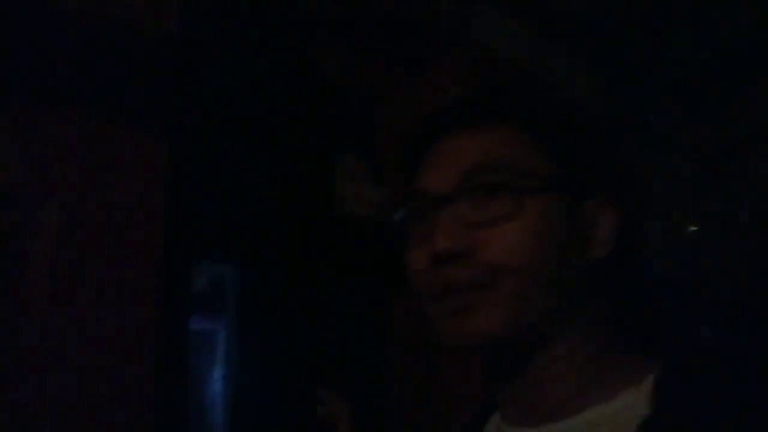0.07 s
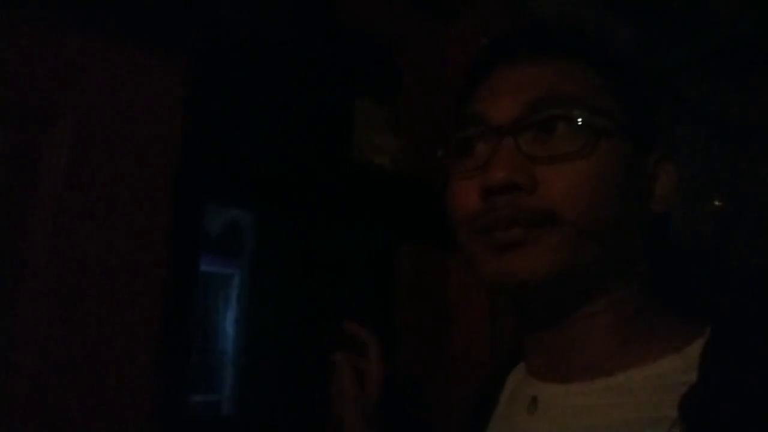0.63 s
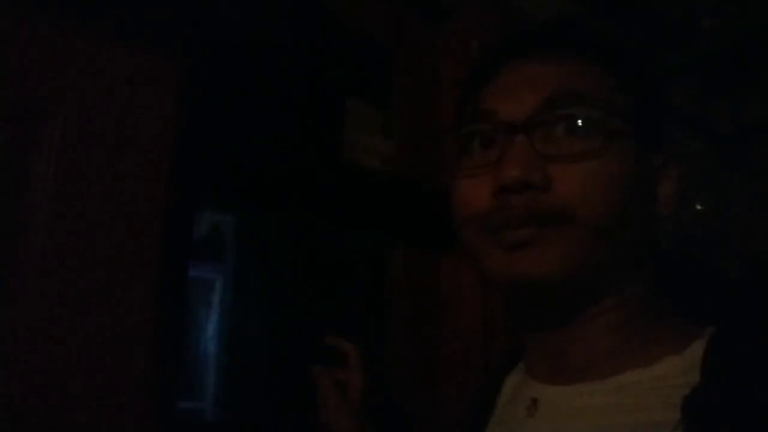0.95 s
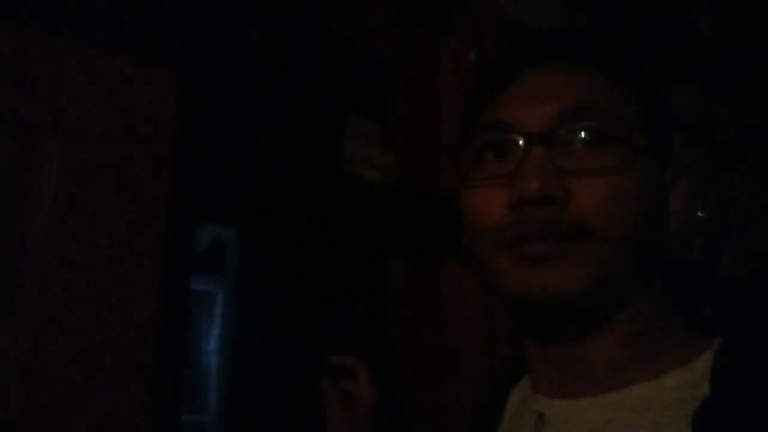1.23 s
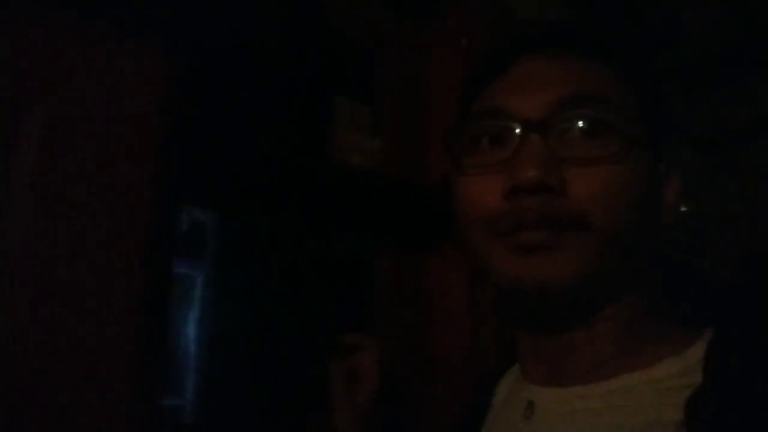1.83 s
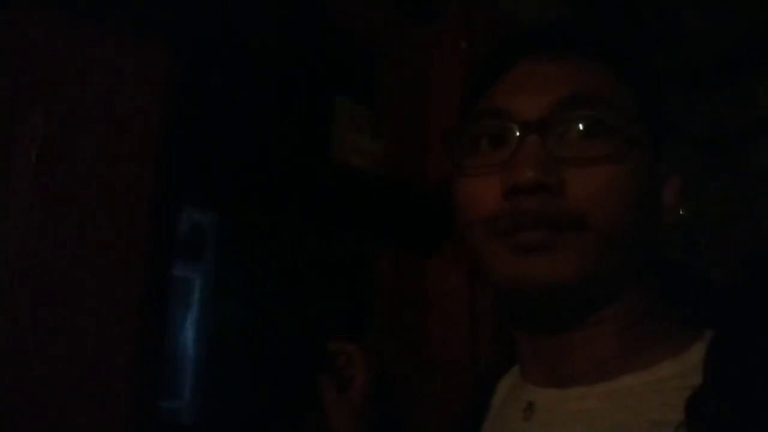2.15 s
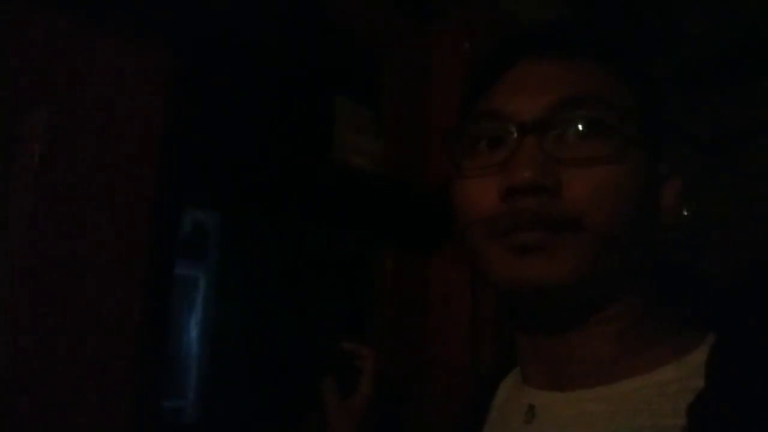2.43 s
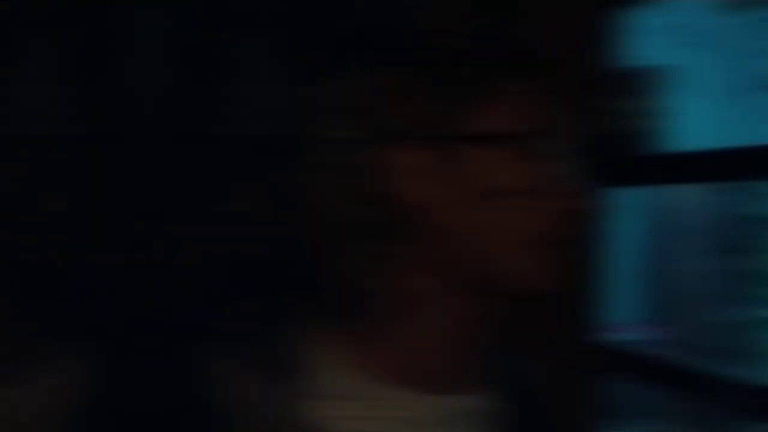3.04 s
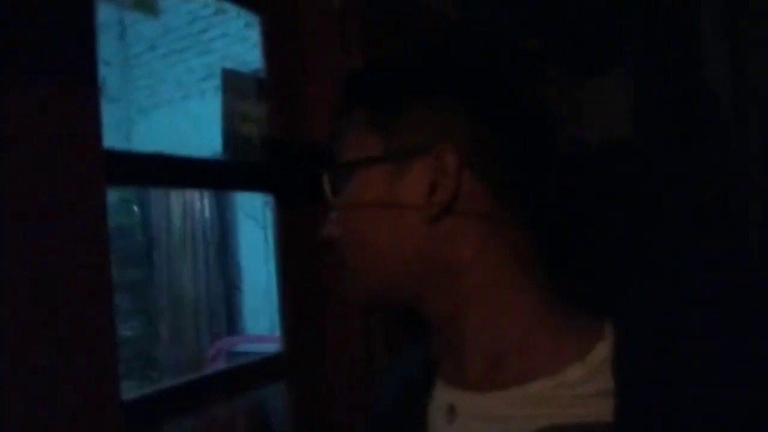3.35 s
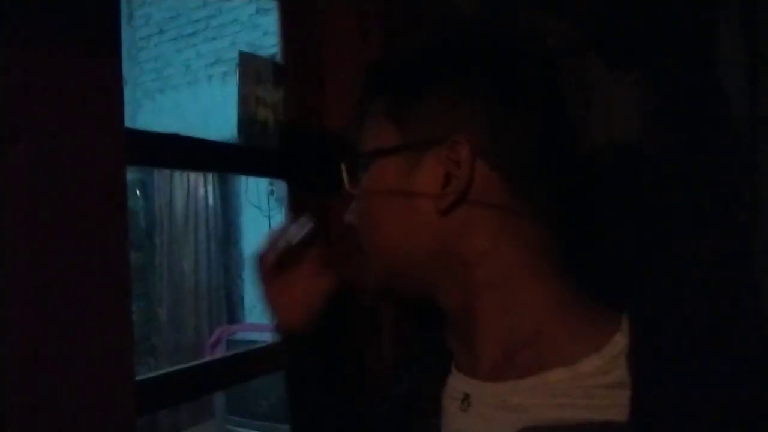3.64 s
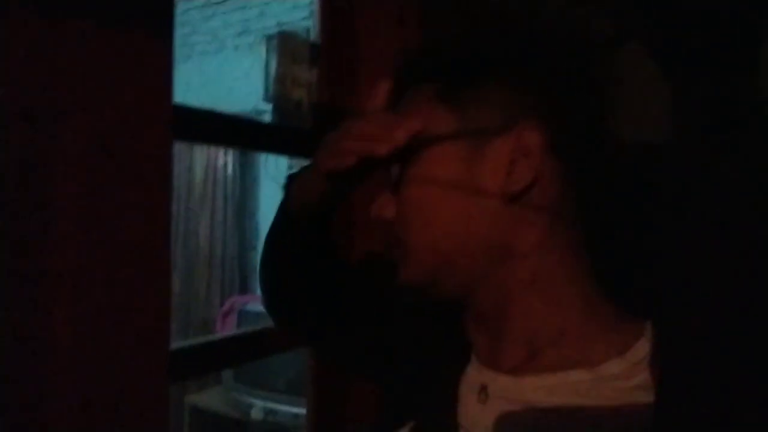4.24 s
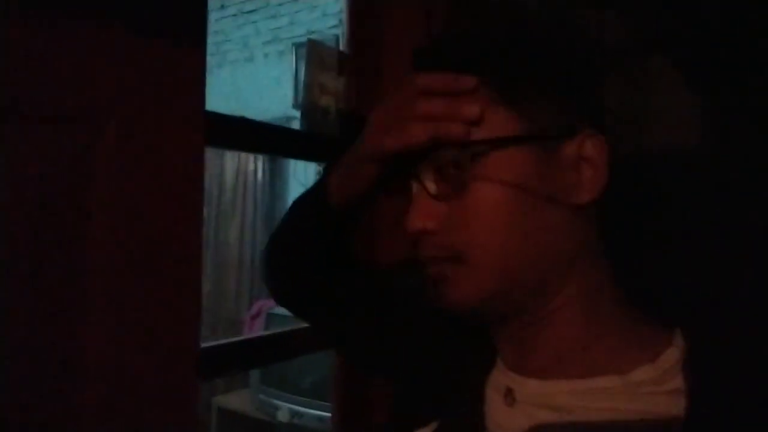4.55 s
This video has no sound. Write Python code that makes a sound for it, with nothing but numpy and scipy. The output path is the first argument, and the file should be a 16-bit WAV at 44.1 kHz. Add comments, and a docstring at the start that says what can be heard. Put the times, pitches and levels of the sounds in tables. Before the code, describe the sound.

Twelve quick, even knuckle knocks on a rattling glass window pane, with crickets chirping steadily outdoors at night.

```python
"""Knocks on a window at night

Knuckles strike a pane twelve times: its modes thump and ring, it chatters in its frame, the frame
shudders low. Crickets rasp their wings, one near, a chorus far, over faint outdoor rumble and hiss.
Soft brushes pass now and then. After the knocks come two low handling bumps on the phone, light taps
of a hand and squeaks of skin on the glass. Nearby walls return a short echo."""
import sys
import numpy as np
from scipy import signal
from scipy.fft import rfft, irfft, next_fast_len
from scipy.io import wavfile
from scipy.ndimage import map_coordinates

SR = 44100
rng = np.random.default_rng(int(sys.argv[2]) if len(sys.argv) > 2 else 0)


def pcm_store(signal):
    """Save signal as 16-bit PCM."""
    levels = np.round(np.clip(np.atleast_2d(signal), -1, 1) * 32767)
    wavfile.write(sys.argv[1], SR, levels.astype(np.int16).T)


N = 207005
TIME = np.arange(N) / SR

# Outdoor rumble: f/Hz, density/dB
RUMBLE_SPECTRUM = [(25, -37), (36, -33), (48, 6), (70, 3), (95, -0.5), (150, -8), (250, -17.5), (400, -23),
                   (700, -26.5), (1500, -41), (4000, -78)]
# Air hiss: f/Hz, density/dB
HISS_SPECTRUM = [(300, 14.5), (1000, 2.5), (2500, 2), (5000, -1.5), (8000, -8), (11000, -4.5),
                 (14000, -23.5), (15500, -11.5)]
# Base level of crickets and hiss: t/s, level/dB
CHORUS_LEVEL = [(0, -52.5), (2.55, -53), (3.2, -56.5), (3.55, -55), (4.69, -53.5)]
# Chirp runs of the near cricket: start/s, end/s, period/s
CHIRP_RUNS = [(0.023, 0.71, 0.125), (0.777, 1.54, 0.139), (1.591, 2.6, 0.131), (2.735, 3.21, 0.135),
              (3.345, 3.85, 0.149), (3.905, 4.72, 0.152)]
# Cricket wing resonance: f/Hz, density/dB
WING_SPECTRUM = [(4800, -72), (5800, -17.5), (6250, -5), (6600, 2.5), (6880, 4.5), (7150, -1), (7500, -15),
                 (8500, -22), (11500, -29), (12800, -19), (13800, -19), (15000, -38)]
# Knuckle contacts, some in quick pairs: t/s, thump/dB, ring/dB, click/dB, hollowness/dB
CONTACTS = [(0.486, -30, -37.5, -42, -2), (0.7176, -28.5, -35.5, -42, 1.5), (0.93, -27, -32.5, -39, 0),
            (1.1503, -27, -33, -42.5, -3), (1.3916, -30, -42.5, -60, 0), (1.3966, -28.5, -33.5, -41, 2.5),
            (1.628, -30.5, -36, -45.5, -2), (1.862, -31, -35.5, -43, 3.5), (2.0745, -29.5, -34.5, -42, 0),
            (2.2956, -28, -31.5, -39.5, 2.5), (2.509, -59, -33.5, -41, -1),
            (2.5161, -27, -32.5, -45.5, 4.5), (2.7414, -50, -36, -46, -1), (2.7623, -34.5, -38.5, -46, -1),
            (2.9761, -47, -39.5, -46.5, -1.5), (2.994, -39, -44, -51.5, 1)]
# Pane modes: f/Hz, level/dB, t60/s
PANE_MODES = [(46.6, -18, 0.88), (93.63, -28, 1.9), (130.2, -15, 1.05), (166.3, -13.5, 0.18),
              (187, -10, 0.099), (217, -7.5, 0.1), (282.2, -18, 0.26), (343.6, -5.5, 0.13),
              (362.6, -9, 0.2), (403, -15, 0.22), (500.5, -14.5, 0.24), (538.2, -16, 0.23),
              (622.4, -14, 0.13), (757, -11.5, 0.11), (878, -25, 0.41), (980, -32, 0.48),
              (1096, -14, 0.096), (1155, -26.5, 0.27), (1302, -27.5, 0.11), (1580, -25, 0.13),
              (2125, -21, 0.13), (5210, -15, 0.082), (6040, -20, 0.049), (8900, -17, 0.058)]
# Dense upper modes of glass and frame: f/Hz, density/dB
GLASS_SPECTRUM = [(70, -50), (135, -31), (220, 0.5), (380, 2.5), (455, -2.5), (570, 4), (1100, -1.5),
                  (1700, -9), (2600, -15.5), (5000, -23.5), (15000, -39)]
# Decay of the dense modes: f/Hz, t60/s
GLASS_T60 = [(200, 0.21), (700, 0.12), (2000, 0.14), (10000, 0.15)]
# Bone meeting glass: f/Hz, density/dB
SNAP_SPECTRUM = [(600, -36), (2500, -15), (7000, -8), (13000, 0), (16000, 8)]
# Glass chattering against the frame: f/Hz, density/dB
CHATTER_SPECTRUM = [(500, -26), (1500, -6.5), (3000, -1), (5000, 0.5), (6800, 9), (8200, 5), (10500, 2),
                    (14000, -7.5), (16000, -21.5)]
# Shaken frame: f/Hz, density/dB
SHUDDER_SPECTRUM = [(25, -40), (36, -18), (46, 12.5), (62, 1), (80, -5), (110, -9), (160, -3), (400, -23),
                    (1500, -50)]
# Decay of the wall echo: f/Hz, t60/s
ECHO_T60 = [(100, 0.44), (400, 0.48), (850, 0.53), (1500, 0.2), (5000, 0.21), (14000, 0.36)]
# Soft brushes and, below 100 Hz, handling bumps: t/s, half-width/s, centre/Hz, level/dB
BRUSHES_AND_BUMPS = [(0.647, .03, 9000, -58.5), (2.384, 0.017, 8250, -54), (3.734, 0.076, 83, -55),
                     (4.097, 0.22, 92, -59.5), (4.19, 0.05, 450, -62.5), (4.603, 0.02, 1800, -67)]
# Hand taps: t/s, level/dB, note/Hz, cutoff/Hz
HAND_TAPS = [(3.818, -44, 800, 2750), (3.847, -43, 1097, 5540)]
# Noise of a tap: f/Hz, density/dB
TAP_SPECTRUM = [(250, -13), (500, -3), (1100, -9), (1650, -2), (2300, -4), (3100, -9), (4000, -14),
                (5500, -15), (9000, -40)]
# Skin squeaks: t/s, half-width/s, f/Hz, level/dB
SKIN_SQUEAKS = [(4.54, 0.013, 3170, -66.5), (4.643, 0.034, 3170, -60)]
# Left-right likeness of diffuse sound: f/Hz, coherence/1
COHERENCE = [(60, 0.99), (300, 0.87), (700, 0.61), (1400, 0), (3000, 0.076), (7000, 0)]
# Channel balance: f/Hz, left minus right/dB
BALANCE = [(400, -0.4), (700, 0), (1100, 1.5), (2500, 0.5), (6500, 3.5), (14000, 2.5)]


def amp(db):
    """Decibels to gain."""
    return 10 ** (np.asarray(db) / 20)


def unit(x):
    """Scale to rms 1."""
    return x / np.sqrt(np.mean(x ** 2) + 1e-20)


def along(points, hz):
    """Interpolate (f/Hz, value) points on a log axis."""
    f, v = np.transpose(points)
    return np.interp(np.log(hz + 1), np.log(f + 1), v)


def fade(t, t60_s):
    """Free decay, 60 dB down at t60_s."""
    return np.exp(-np.log(1000) * t / t60_s)


def wobble(rate_hz):
    """Smooth random curve, rate_hz knots a second."""
    return map_coordinates(rng.standard_normal(256), [TIME * rate_hz], mode="wrap")


def add(track, at_s, sound):
    """Mix a sound into the track."""
    start = round(at_s * SR)
    track[..., start:start + sound.shape[-1]] += sound[..., :N - start]


def filtered(x, response):
    """Apply a frequency response."""
    n = x.shape[-1]
    m = next_fast_len(n + 8192)
    return irfft(rfft(x, m) * response(np.fft.rfftfreq(m, 1 / SR)), m)[..., :n]


def noise(spectrum, size=N):
    """Coloured stereo noise, rms 1, coherent in the bass."""
    def mid_side_gains(hz):
        angle = np.arccos(along(COHERENCE, hz)) / 2
        return amp(along(spectrum, hz)) * [np.cos(angle), np.sin(angle)]
    mid, side = filtered(rng.standard_normal((2, size)), mid_side_gains)
    return unit(np.array([mid + side, mid - side]))


def damped(x, decays):
    """Decay each frequency of x at its own t60."""
    hz, t, bins = signal.stft(x, SR, nperseg=256)
    _, out = signal.istft(bins * fade(t, along(decays, hz)[:, None]), SR, nperseg=256)
    return out[:, :x.shape[-1]]


def night_air(chorus_db, rumble_db=-55.5, swell_db=2, hiss_db=-8):
    """Uneven low rumble; thin hiss that follows the chorus level."""
    rumble = amp(rumble_db + swell_db * wobble(6.73)) * noise(RUMBLE_SPECTRUM)
    return rumble + amp(chorus_db + hiss_db) * noise(HISS_SPECTRUM)


def chirp_envelope(sigma_s=0.021, scatter_db=0.5):
    """Soft, evenly spaced swells in runs, with a hitch between runs."""
    times = np.concatenate([np.arange(*run) for run in CHIRP_RUNS])
    gains = amp(scatter_db * rng.standard_normal(len(times)))
    return sum(gain * np.exp(-((TIME - at_s) / sigma_s) ** 2 / 2) for at_s, gain in zip(times, gains))


def stridulation(stroke_hz=52.17, depth_db=5, tone_hz=6830, glide_hz=230, tone_db=-4):
    """Each stroke rasps over the wing's resonance with a falling note, blurred by leaves."""
    stroke_phase = np.cumsum(stroke_hz * (1 + 0.1015 * wobble(6))) / SR % 1
    pitch_hz = tone_hz + glide_hz * (1 - 2 * stroke_phase + wobble(47))
    note = np.sin(2 * np.pi * np.cumsum(pitch_hz) / SR)
    rasp = noise(WING_SPECTRUM)
    blurred = unit(note + echo(np.array([note, note])))
    pulses = amp(-depth_db * np.cos(2 * np.pi * stroke_phase))
    return unit(pulses * (rasp + amp(tone_db) * blurred))


def crickets(chorus_db, near_db=3, pan_db=2, far_db=0.43, swell_db=1):
    """One cricket to the left, about seven chirps a second, over a softly swelling chorus."""
    near = amp(near_db) * chirp_envelope() * stridulation()
    far = amp(far_db + swell_db * wobble(24.92)) * noise(WING_SPECTRUM)
    return amp(chorus_db) * (near * amp([[pan_db], [-pan_db]]) + far)


def pane_ring(t, thump_db, ring_db, split_hz=270, scatter_db=1.93, detune=0.0067):
    """The hand's weight drives the low modes; higher ones depend more on the spot struck."""
    hz, db, t60_s = np.transpose(PANE_MODES)[:, :, None]
    spot, seating = rng.standard_normal((2, *hz.shape))
    low_share = 1 / (1 + (hz / split_hz) ** 6)
    spread_db = np.minimum(scatter_db * hz / split_hz, 4)
    drive_db = low_share * thump_db + (1 - low_share) * ring_db + spread_db * spot
    pitch_hz = hz * (1 + detune * (1 - low_share) * seating)  # the pane reseats at each blow
    return -np.sum(amp(db + drive_db) * np.sin(2 * np.pi * pitch_hz * t) * fade(t, t60_s), axis=0)


def chatter(t, looseness, snap_db=5, tail_db=-11, burst_db=3, stretch=0.95):
    """Bright snap, then the pane hits its frame in uneven bursts, longer under a loose hand."""
    snap = amp(snap_db) * (1 - looseness) * fade(t, t60_s=0.0064) * noise(SNAP_SPECTRUM, len(t))
    crack = fade(t, t60_s=0.071 * (1 + stretch * looseness))
    tail = amp(tail_db) * fade(t, t60_s=0.12)
    bursts = amp(burst_db * wobble(rate_hz=700)[:len(t)])
    return snap + (crack + tail) * unit(bursts * noise(CHATTER_SPECTRUM, len(t)))


def knocks(pane_db=2, glass_db=-1.5, chatter_db=2, shared=0.21, stretch=0.083,
           hollow_hz=430, hollow_oct=0.6):
    """Each contact rings the pane and makes it chatter; the spot struck sets the hollowness."""
    out = np.zeros((2, N))
    ring_t, t = TIME[:3 * SR // 2], TIME[:SR // 2]
    common = noise(GLASS_SPECTRUM, len(t))
    for at_s, thump_db, ring_db, click_db, hollow_db in CONTACTS:
        looseness = 1 / (1 + amp(thump_db - click_db) ** 2)  # a light hand clatters on
        colour = lambda hz: amp(hollow_db * np.exp(-(np.log2((hz + 1) / hollow_hz) / hollow_oct) ** 2))
        add(out, at_s, amp(pane_db) * filtered(pane_ring(ring_t, thump_db, ring_db), colour))
        # each new spot remixes the upper modes
        upper = np.sqrt(shared) * common + np.sqrt(1 - shared) * noise(GLASS_SPECTRUM, len(t))
        decays = [(hz, t60_s * (1 + stretch * looseness)) for hz, t60_s in GLASS_T60]
        add(out, at_s, amp(ring_db + glass_db) * filtered(damped(upper, decays), colour))
        add(out, at_s, amp(click_db + chatter_db) * chatter(t, looseness))
    return out


def frame_shudder(gain_db=-22.5, rise_s=0.044, t60_s=1.66):
    """Each knock's weight shakes the frame; the power piles up from blow to blow."""
    power = np.zeros(N)
    envelope = (1 - np.exp(-TIME / rise_s)) * fade(TIME, t60_s)
    for at_s, thump_db, *_ in CONTACTS:
        add(power, at_s, (amp(thump_db + gain_db) * envelope) ** 2)
    return np.sqrt(power) * noise(SHUDDER_SPECTRUM)


def echo(x, delay_s=0.012):
    """Short, diffuse return from nearby walls."""
    white = noise([(100, 0), (10000, 0)], SR // 2)
    tail = damped(white, ECHO_T60)
    impulse = np.pad(tail / np.linalg.norm(tail[0]), ((0, 0), (round(delay_s * SR), 0)))
    return signal.fftconvolve(x, impulse, axes=1)[:, :N]


def brushes_and_bumps(band_ratio=1.92):
    """Soft brushes and low handling bumps on the phone: short swells of band noise."""
    out = np.zeros((2, N))
    for at_s, width_s, hz, db in BRUSHES_AND_BUMPS:
        band = [(hz * band_ratio ** step, -15 * step ** 2) for step in range(-2, 3)]
        out += amp(db) * np.exp(-((TIME - at_s) / width_s) ** 2) * noise(band)
    return out


def taps(note_db=1, attack_s=0.0014):
    """Two light touches of the hand, each with a short hollow note."""
    out, t = np.zeros((2, N)), TIME[:SR // 4]
    for at_s, db, note_hz, cutoff_hz in HAND_TAPS:
        touch = noise(TAP_SPECTRUM, len(t)) * fade(t, t60_s=0.098)
        note = amp(note_db) * np.sin(2 * np.pi * note_hz * t) * fade(t, t60_s=0.039)
        lowpass = signal.butter(4, cutoff_hz, fs=SR, output="sos")
        add(out, at_s, amp(db) * (1 - np.exp(-t / attack_s)) * signal.sosfilt(lowpass, touch + note))
    return out


def squeaks(waver=0.03, rough_db=4):
    """Skin sticks and slips on the glass: a thin, rough note."""
    out = np.zeros(N)
    for at_s, width_s, hz, db in SKIN_SQUEAKS:
        phase = 2 * np.pi * np.cumsum(hz * (1 + waver * wobble(350))) / SR
        note = unit(amp(rough_db * wobble(200)) * np.sin(phase))
        out += amp(db) * np.exp(-((TIME - at_s) / width_s) ** 2) * note
    return out


def scene(left_lag_s=0.00008, echo_db=-14):
    """Window and hand close by, slightly to one side; the night all around."""
    chorus_db = np.interp(TIME, *np.transpose(CHORUS_LEVEL))
    hand = knocks() + taps() + squeaks()
    close = filtered(hand, lambda hz: np.exp(1j * np.pi * left_lag_s * np.outer([-1, 1], hz)))
    foreground = close + amp(echo_db) * echo(close) + frame_shudder() + brushes_and_bumps()
    return foreground + crickets(chorus_db) + night_air(chorus_db)


def record(dry, low_hz=37, top_hz=15400):
    """Microphones: treble favours the left; deepest bass and highest treble cut."""
    tilted = filtered(dry, lambda hz: amp(np.outer([1, -1], along(BALANCE, hz)) / 2))
    highpass = signal.butter(8, low_hz, "high", fs=SR, output="sos")
    return filtered(signal.sosfilt(highpass, tilted), lambda hz: 1 / (1 + (hz / top_hz) ** 60))


dry = scene()
out = record(dry)
pcm_store(out)
```